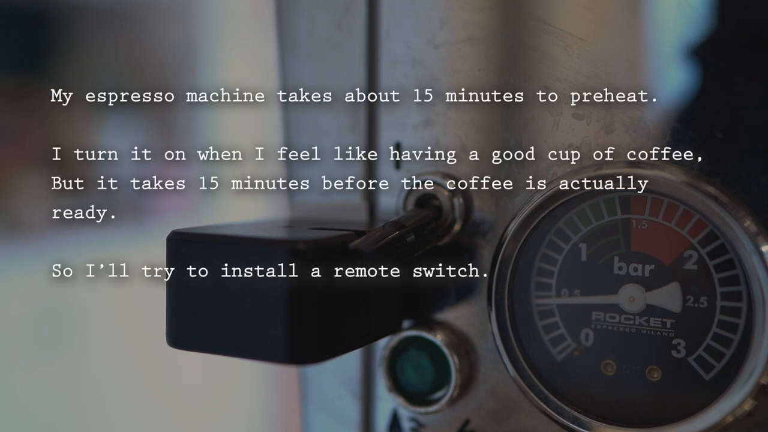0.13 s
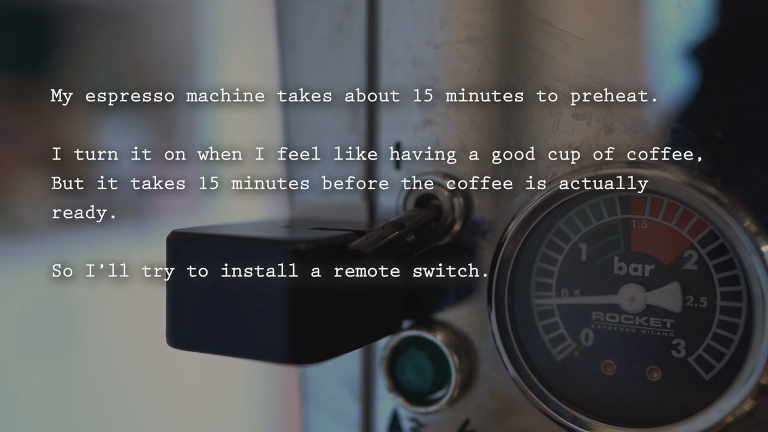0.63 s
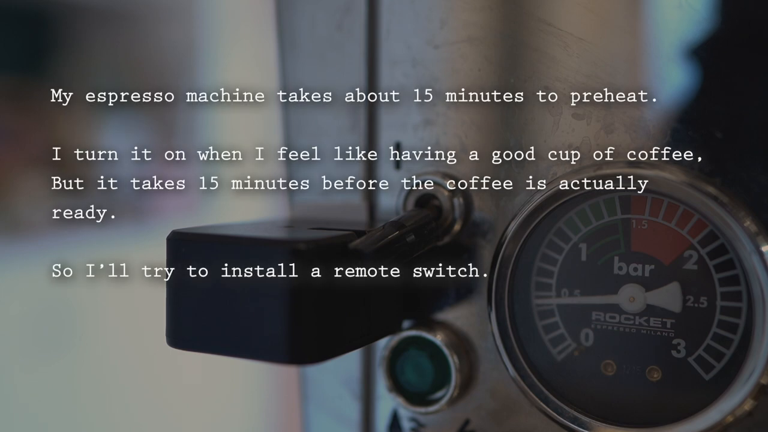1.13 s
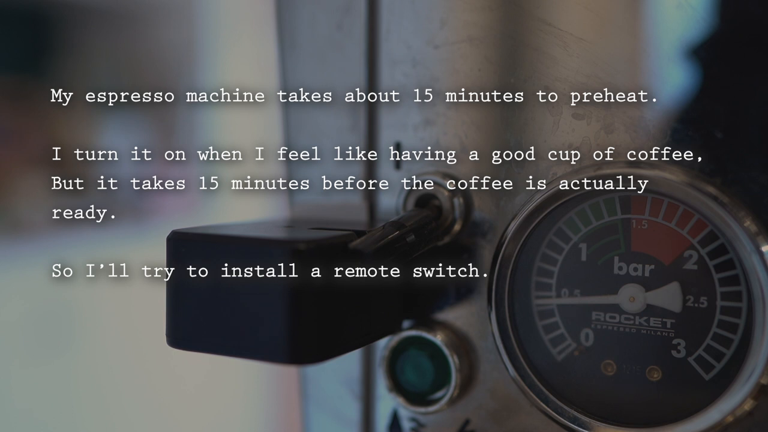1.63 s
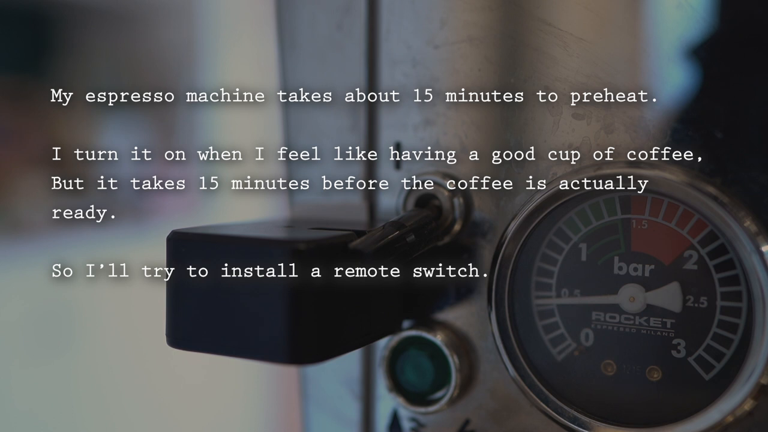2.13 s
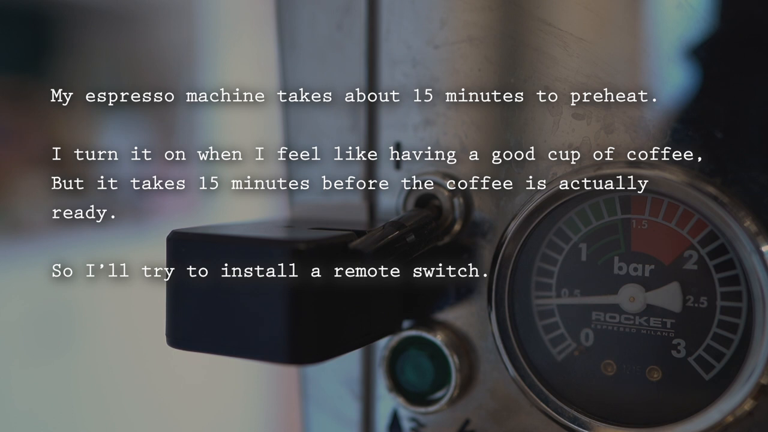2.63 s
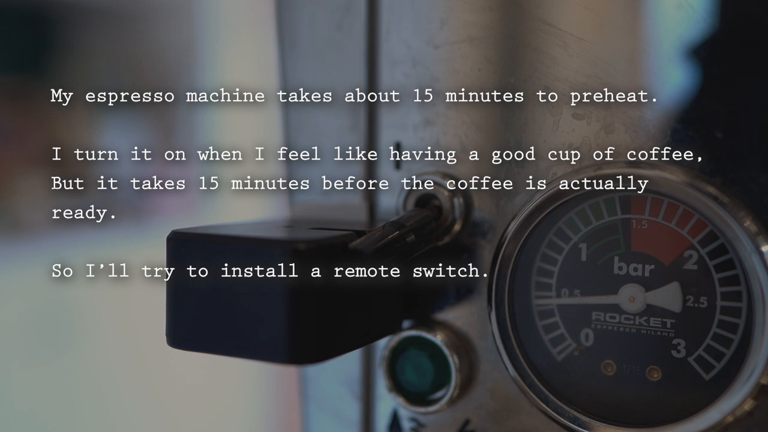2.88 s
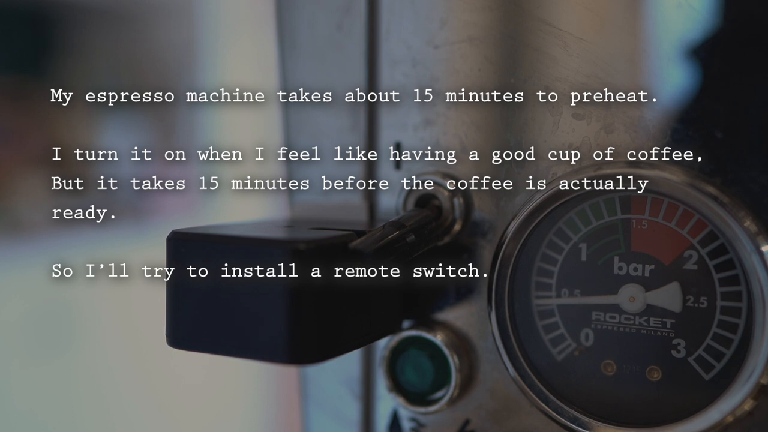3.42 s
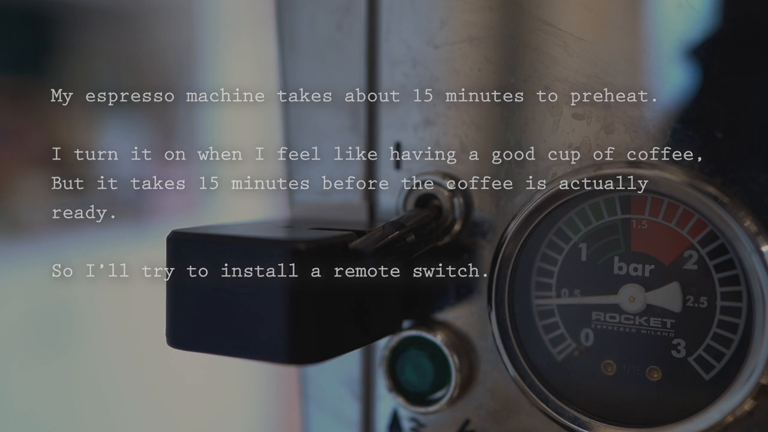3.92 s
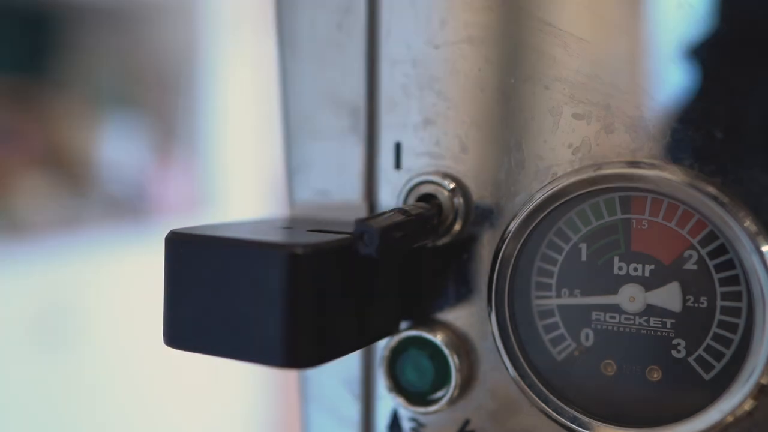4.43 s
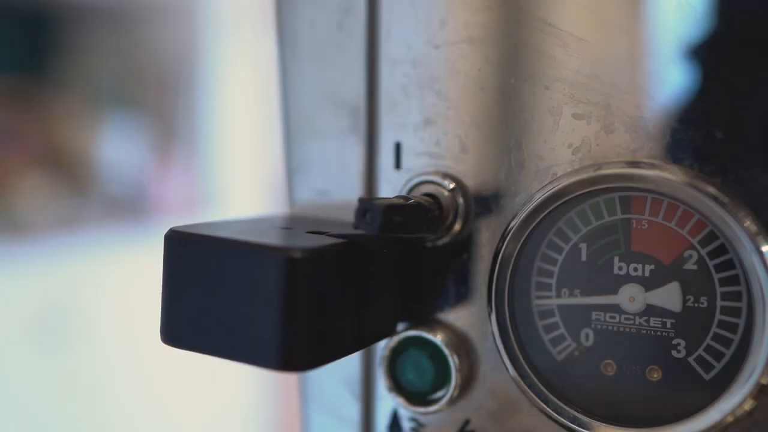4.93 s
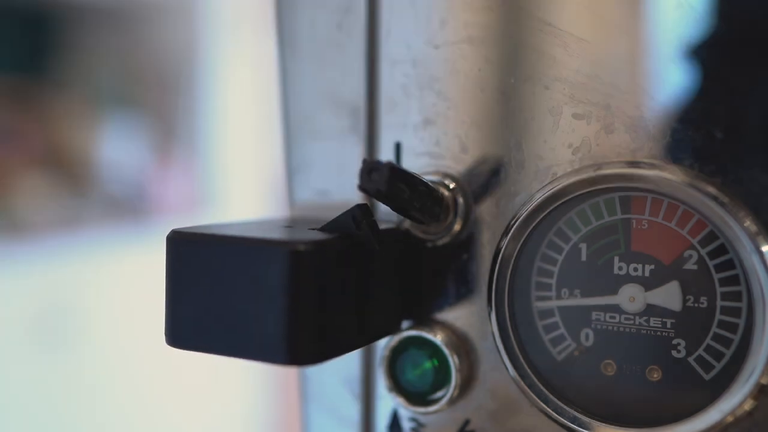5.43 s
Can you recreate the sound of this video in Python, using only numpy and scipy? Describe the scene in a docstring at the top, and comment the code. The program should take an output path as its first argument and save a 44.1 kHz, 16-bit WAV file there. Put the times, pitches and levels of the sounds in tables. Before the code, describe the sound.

A quiet kitchen with low rumble and faint hiss; a wall clock ticks softly twice, a second apart. Then a small geared motor in a plastic box starts abruptly with a tiny rattle, whines steadily, and slides down in pitch as it strains. A metal toggle switch snaps very loudly, ringing its steel cabinet and echoing briefly. Close stereo microphone.

```python
"""Quiet kitchen: a small geared motor in a plastic case pushes the lever of a toggle switch on a steel cabinet.
Motor: shaft-order lines and grainy noise through ranges of the case; slows as the lever's spring loads it.
Switch: slips, landing and bounces strike decaying modes of body and cabinet; noise bands die away as the echo.
Background: a wall clock ticks twice (struck modes) over rumble, a narrow hum and microphone hiss (shaped noise)."""
import sys
import numpy as np
from scipy import signal
from scipy.fft import rfft, irfft, next_fast_len
from scipy.io import wavfile
from scipy.ndimage import uniform_filter1d

SR = 44100
rng = np.random.default_rng(int(sys.argv[2]) if len(sys.argv) > 2 else 0)


def store_pcm(level_fs):
    """Save levels as 16-bit WAV."""
    pcm = np.round(np.clip(level_fs, -1, 1) * 32767).astype(np.int16)
    wavfile.write(sys.argv[1], SR, np.atleast_2d(pcm).T)


def how_loud(loudness_db):
    """Turn decibels into a plain amplitude multiplier (0 dB gives 1, 20 dB gives 10)."""
    steps = np.asarray(loudness_db, float) / 20
    return 10 ** steps


N = 244755

# room rumble spectrum, relative: f/Hz, level/dB
ROOM_SPECTRUM = [(12, -38), (20, -13), (70, -5.5), (102, -7.5), (171, -4), (256, -6), (289, -1),
                 (316, -12.5), (339, -2.5), (418, -9.5), (456, -6.5), (1300, -14), (1690, -73),
                 (2860, -120)]
# left-right likeness of the rumble: f/Hz, likeness/1
ROOM_LIKENESS = [(60, 0.97), (130, 0.93), (290, 0.78), (640, -0.15), (1410, -0.3), (3100, -1.17),
                 (6820, 0.81), (15000, 0.14)]
# microphone hiss spectrum, relative: f/Hz, density/dB per Hz
MIC_HISS_SPECTRUM = [(760, -71), (1300, -2.5), (3010, -6), (9970, -9.5), (15200, -12), (16000, -20)]
ROOM_DB, MIC_HISS_DB = -62.5, -63.5
HUM_HZ, HUM_WIDTH_HZ, HUM_DB = 290, 20, -76

# clock ticks: t/s, level/dB
CLOCK_TICKS = [(1.6495, -48.5), (2.651, -49.5)]
# clock modes: f/Hz, level/dB, t60/s
CLOCK_MODES = [(770, -5, .035), (930, -4, .04)]

# shaft speed as tooth-mesh rate: t/s, f/Hz
MESH_RATE = [(3.76, 1500), (3.82, 1700), (3.87, 1719), (4.075, 1698), (4.12, 1630), (4.2, 1415),
             (4.26, 1232), (4.33, 1197), (4.47, 1075), (4.52, 900), (4.6, 790), (5.06, 650)]
# armature slot harmonics, from the first: level/dB
SLOT_HARMONICS_DB = [-8, -6, -8, -5, -3, -6, 7, 10, 3, -3, 2, 10, -5, -2, -6]
# tooth-mesh harmonics, from the fourth: level/dB
MESH_HARMONICS_DB = [6, 12, 7, 3, 3, 4, 6, 6, 5, 4]
TEETH, SLOTS = 12, 3
OTHER_ORDER_DB, HIGH_SLOT_DB = -7, -3   # remaining shaft orders; slot harmonics past the table
# steady whine over grinding: mesh f/Hz, level/dB
WHINE_OVER_GRIND = [(650, -20), (900, -9), (1090, -1), (1200, 6), (1300, 3), (1450, 4), (1600, 8),
                    (1715, 8)]
UNSETTLED_DB = -22   # added to the whine before the gears settle
# grinding noise per case range (buzz, rattle, high hiss, drone, rumble), subtracted from the whine: level/dB
GRIND_DB = [-2, 1.5, 2.5, 5, 8]
# what the case passes, relative, one table per range: f/Hz, density/dB per Hz
BUZZ_SPECTRUM = [(1120, -45), (1900, -13), (2200, -8), (2580, -10), (2700, 1), (2800, 2), (3000, -2),
                 (3260, -9), (3650, -10), (3900, -19), (4200, -38), (5200, -56)]
# as above, rattle range: f/Hz, density/dB per Hz
RATTLE_SPECTRUM = [(4000, -52), (5300, -44), (5750, -12), (6250, -3), (6900, -3), (7600, -1), (8300, -1),
                   (8700, -5), (9100, -2), (9500, -8), (11000, -30), (16000, -70)]
# as above, high hiss band: f/Hz, density/dB per Hz
HIGH_HISS_SPECTRUM = [(6000, -16), (8500, -14), (10100, 6), (11700, 4), (12800, 3.5), (14300, 0),
                      (15500, 2), (16000, -65)]
# as above, drone range: f/Hz, density/dB per Hz
DRONE_SPECTRUM = [(530, -48), (900, -5.5), (1200, -8.5), (1310, 5), (1750, 7.5), (2300, -26), (2990, -36),
                  (5060, -120)]
# as above, rumble range: f/Hz, density/dB per Hz
RUMBLE_SPECTRUM = [(60, -37), (110, -5), (200, -2), (400, -6), (600, -3), (900, -11.5), (1300, -19),
                   (2500, -60)]
# even running noise between the ranges, relative: f/Hz, density/dB per Hz
WHIRR_SPECTRUM = [(1000, -41), (1800, -3), (4300, -5), (5600, 4), (6500, -2), (9000, 2.5), (11000, -18),
                  (16000, -60)]
# motor balance: f/Hz, left minus right/dB
MOTOR_PAN = [(60, -1), (110, -7), (200, -12), (380, 6), (700, 1), (1290, -4), (2380, 1), (4400, -15.5),
             (8120, -4.5), (15000, -4.5)]
# left-right likeness of the grinding: f/Hz, likeness/1
MOTOR_LIKENESS = [(60, 0.86), (130, 0.98), (290, 0.57), (640, 0.18), (1410, 0.18), (3100, 0.88),
                  (6820, 0.02), (15000, 0.32)]
# level of the high hiss band up to the snap: t/s, level/dB
HIGH_HISS_LEVEL = [(3.77, -68), (3.776, -54), (3.798, -44), (3.822, -58), (3.89, -52.5), (3.922, -57),
                   (4.176, -46), (4.452, -48.5), (4.794, -72), (4.948, -71), (4.958, -71), (5.052, -53.5)]
ON_S, SPIN_UP_S, SETTLE_S = 3.768, .0084, .11   # power on; sound rises; gears settle
OFF_S, RUN_ON_DB, COAST_DB_PER_S = 5.225, -43, 700   # power cut; high hiss then; fall after it
FULL_SPEED_HZ = 1715   # mesh rate; octaves below count slowing
BUZZ_DB, BUZZ_DB_PER_OCTAVE, BUZZ_TOP_DB = -60.5, 7, -55   # harder as the shaft slows
FLUTTER_DB_PER_OCTAVE = .5   # and less evenly
RATTLE_DB, RATTLE_FOLLOWS = -57, .57   # at -50 dB high hiss; share of its swing
RATTLE_SINGS_DB, RATTLE_SINGS_OCTAVES = 8, .17   # extra near full speed; how near
DRONE_DB, DRONE_SINGS_DB, DRONE_SINGS_OCTAVES = -80, 23.5, .05
RUMBLE_DB, RUMBLE_DB_PER_OCTAVE, RUMBLE_WAVER_DB = -69, 1.5, 2.5
WHIRR_DB, WHIRR_DB_PER_OCTAVE = -66, 1.5

# small gears' ringing modes: f/Hz, level/dB, t60/s
GEAR_MODES = [(2800, -8, .008), (6900, -11, .004), (9500, -6, .004), (10400, -4, .005), (11300, -3, .005),
              (12600, -11, .003)]
# start-up knock: t/s, level/dB
KNOCK_EVENTS = [(3.803, -48)]
# knock modes: f/Hz, level/dB, t60/s
KNOCK_MODES = [(1520, -0.5, 0.014), (2770, 2, .01)]
TOUCH_S, TOUCH_DB = 3.7757, -44
CHATTER_S, CHATTER_GAP_S, CHATTER_DB = 3.789, .0038, -45
KITCHEN_DB, KITCHEN_T60_S = -6, .25   # tail relative to direct motor sound

# switch body modes: f/Hz, level/dB, t60/s
SWITCH_MODES = [(2550, -6, .008), (3000, -4, .007), (3400, -8, .006), (3800, -5, .008), (6200, -9, .004),
                (7500, -12, .004), (8600, -10, .004), (10300, -9, .004), (11600, -10, .004),
                (13700, -11, .003), (15200, -18, .003)]
# steel cabinet modes: f/Hz, level/dB, t60/s
CABINET_MODES = [(236, -11, .6), (291, -14.5, 2.5), (352, -8, .58), (410, -2, .45), (472, -3, .4),
                 (500, -4, .35), (530, 6, .07), (545, -9, 1.3), (566, -5, .4), (714, -2, .36),
                 (790, -4, .33), (825, -5.5, 1.6), (888, -8, .39), (1093, -11, .44), (1392, -8, .2),
                 (1653, -16, 1.3), (1769, 0, .12), (2213, -4, .22), (2540, -4, .2), (3128, -11, .31),
                 (3951, -12, .54)]
# echo spectrum in cabinet and room, relative: f/Hz, level/dB
ECHO_SPECTRUM = [(41, -56), (70, -8), (155, -34), (385, -9.5), (649, -13.5), (797, -5), (1250, -17),
                 (1580, -10.5), (1980, -14.5), (2480, -7.5), (3900, -12), (4500, -15.5), (5250, -14.5),
                 (5620, -18.5), (6160, -12.5), (10400, -10), (16000, -11)]
# echo decay: f/Hz, t60/s
ECHO_DECAY = [(100, 0.97), (260, 0.77), (700, 0.48), (1840, 0.42), (4850, 0.38), (12800, 0.2)]
# left-right likeness of echo and kitchen tail: f/Hz, likeness/1
ECHO_LIKENESS = [(60, .97), (290, .96), (640, .85), (1100, .6), (1600, .35), (3100, .09), (6820, 0),
                 (15000, 0)]
CABINET_DB, ECHO_DB = -38, -19.5
LANDS_S, LANDS_DB = 5.0691, -9.5
SLIP_GAP_S, SLIP_QUICKENS, SLIP_RISE_DB = .00055, 1.2, 4.2   # SLIP_QUICKENS: exponent
BOUNCE_S, BOUNCE_GAP_S, BOUNCE_DB, BOUNCE_LOSS_DB = 5.07, .0014, -15.5, 2.8


def rms_one(x):
    """Scale to unit rms."""
    return x / np.sqrt(np.mean(x ** 2) + 1e-20)


def at_hz(points, hz):
    """Read a table on a log-frequency axis."""
    table_hz, values = np.transpose(points)
    return np.interp(np.log(hz + 1), np.log(table_hz), values)


def bins_hz(size):
    """Bin frequencies of a real FFT."""
    return np.arange(size // 2 + 1) * SR / size


def colour(x, spectrum):
    """Shape by a spectrum; rms 1."""
    size = x.shape[-1]
    gain = how_loud(at_hz(spectrum, bins_hz(size)))
    return rms_one(irfft(rfft(x) * gain, size))


def stereo_noise(size, likeness):
    """White noise whose channels share a frequency-dependent part."""
    mid, side = rfft(rng.standard_normal((2, size)))
    alike = np.clip(at_hz(likeness, bins_hz(size)), -.99, .99)
    shared = np.sqrt(1 + alike) * mid
    opposed = np.sqrt(1 - alike) * side * [[1], [-1]]
    return irfft(shared + opposed, size) / np.sqrt(2)


def drift(t_s, per_s):
    """Random values joined by straight lines."""
    knots_s = np.arange(t_s[0], t_s[-1] + 1, 1 / per_s)
    return np.interp(t_s, knots_s, rng.standard_normal(len(knots_s)))


def ring(events, modes, spread_db):
    """Each blow strikes every decaying mode, with its own strength in each ear."""
    out = np.zeros((2, N))
    at = [round(t_s * SR) for t_s, _ in events]
    blow_db = np.array(events)[:, 1]
    for hz, level_db, t60_s in modes:
        clicks = np.full((2, N), 1e-18)   # tiny floor, inaudible
        uneven_db = spread_db * rng.standard_normal((len(at), 2)).T
        clicks[:, at] = how_loud(blow_db + level_db + uneven_db)
        r = how_loud(-60 / (t60_s * SR))
        w = 2 * np.pi * hz / SR
        out += signal.lfilter([0, np.sin(w)], [1, -2 * r * np.cos(w), r * r], clicks)
    return out


def room_tone():
    """Rumble, microphone hiss and a narrow hum, all shaped noise."""
    size = next_fast_len(N)
    resonance = 1 / (1 + ((bins_hz(size) - HUM_HZ) / HUM_WIDTH_HZ * 2) ** 2)
    hum = rms_one(irfft(rfft(rng.standard_normal(size)) * resonance, size))
    rumble = how_loud(ROOM_DB) * colour(stereo_noise(size, ROOM_LIKENESS), ROOM_SPECTRUM)
    rumble[1] = np.roll(rumble[1], 10)   # reaches the left first
    hiss = how_loud(MIC_HISS_DB) * colour(rng.standard_normal((2, size)), MIC_HISS_SPECTRUM)
    return (rumble + hiss + how_loud(HUM_DB) * hum)[:, :N]


def clock():
    """Dull wooden ticks: two short low modes."""
    return ring(CLOCK_TICKS, CLOCK_MODES, spread_db=1.0)


def kitchen(x):
    """Direct sound plus a dying noise tail, which smears gliding lines."""
    t_s = np.arange(SR // 2) / SR
    decay = how_loud(-60 * t_s / KITCHEN_T60_S) * (t_s > .003)
    tail = stereo_noise(len(t_s), ECHO_LIKENESS) * decay
    tail /= np.sqrt(np.sum(tail ** 2) / 2)
    wet = signal.fftconvolve(x.mean(axis=0, keepdims=True), tail, axes=1)[:, :N]
    return (x + how_loud(KITCHEN_DB) * wet) / np.sqrt(1 + how_loud(2 * KITCHEN_DB))


def slack():
    """The gears touch, chatter and knock as the motor starts."""
    chatter = [(CHATTER_S + CHATTER_GAP_S * (k + .15 * late), CHATTER_DB + 1.5 * louder)
               for k, (late, louder) in enumerate(rng.standard_normal((6, 2)))]
    gears = ring([(TOUCH_S, TOUCH_DB)] + chatter, GEAR_MODES, spread_db=2.0)
    return gears + ring(KNOCK_EVENTS, KNOCK_MODES, spread_db=1.0)


def range_levels_db(t_s, mesh_hz, settled):
    """Level of each case range, then the whirr, from shaft speed and high hiss."""
    slowed = np.log2(FULL_SPEED_HZ / mesh_hz)   # octaves
    high_hiss = np.interp(t_s, *np.transpose(HIGH_HISS_LEVEL + [(OFF_S, RUN_ON_DB)]))
    spin_up = 20 * np.log10(1 - np.exp(-((t_s - ON_S) / SPIN_UP_S) ** 2) + 1e-4)
    coast = -COAST_DB_PER_S * np.maximum(t_s - OFF_S, 0)
    buzz = np.minimum(BUZZ_DB + BUZZ_DB_PER_OCTAVE * slowed, BUZZ_TOP_DB)
    buzz = buzz + FLUTTER_DB_PER_OCTAVE * slowed * drift(t_s, per_s=80)
    rattle = RATTLE_DB + RATTLE_FOLLOWS * (high_hiss + 50)
    rattle = rattle + RATTLE_SINGS_DB * settled * np.exp(-(slowed / RATTLE_SINGS_OCTAVES) ** 2)
    drone = DRONE_DB + DRONE_SINGS_DB * settled * np.exp(-(slowed / DRONE_SINGS_OCTAVES) ** 2)
    rumble = RUMBLE_DB + RUMBLE_DB_PER_OCTAVE * slowed + RUMBLE_WAVER_DB * drift(t_s, per_s=30)
    whirr = WHIRR_DB + WHIRR_DB_PER_OCTAVE * slowed
    return spin_up + coast + np.array([buzz, rattle, high_hiss, drone, rumble, whirr])


def order_levels_db():
    """Level of each multiple of the shaft speed: slot and mesh harmonics over the rest."""
    order_db = np.full(TEETH * (len(MESH_HARMONICS_DB) + 3) + 1, float(OTHER_ORDER_DB))
    order_db[SLOTS::SLOTS] = HIGH_SLOT_DB
    order_db[SLOTS::SLOTS][:len(SLOT_HARMONICS_DB)] = SLOT_HARMONICS_DB
    order_db[4 * TEETH::TEETH] = MESH_HARMONICS_DB
    order_db[1] = 0   # unbalance, once a turn
    return order_db


def gear_whine(t_s, shaft_hz, wobble=.0012, waver_db=3.0):
    """Sines at multiples of a slightly unsteady shaft speed; each line swells and fades."""
    shake = rms_one(uniform_filter1d(rng.standard_normal(len(t_s)), size=600))
    turns = np.cumsum(shaft_hz * (1 + wobble * shake)) / SR
    order_db = order_levels_db()
    phases = rng.uniform(0, 2 * np.pi, (len(order_db), 2))
    knots_s = np.linspace(t_s[0], t_s[-1], 40)
    whine = np.zeros((2, len(t_s)))
    for k, phase in enumerate(phases):
        below_nyquist = k * shaft_hz < SR / 2
        waver = np.interp(t_s, knots_s, rng.standard_normal(40))
        ear_phase = phase[0] + np.array([[0], [1.4 * np.sin(phase[1])]])
        line = np.sin(2 * np.pi * k * turns + ear_phase)
        whine += below_nyquist * how_loud(order_db[k] + waver_db * waver) * line
    return rms_one(whine * np.sqrt(shaft_hz / shaft_hz.max()))   # slower shaft, denser lines


def grinding(size, grain_db=3.0):
    """Stereo noise with a fast random grain in its level."""
    grain = rms_one(uniform_filter1d(rng.standard_normal(size), size=40))
    return rms_one(how_loud(grain_db * grain) * stereo_noise(size, MOTOR_LIKENESS))


def motor():
    """Whine and grinding drive five ranges of the case; whirr and gear slack are added."""
    start = round(ON_S * SR)
    t_s = np.arange(start, start + round(1.57 * SR)) / SR
    run = slice(start, start + len(t_s))
    mesh_hz = np.interp(t_s, *np.transpose(MESH_RATE))
    settled = 1 - np.exp(-((t_s - ON_S) / SETTLE_S) ** 2)
    range_db = range_levels_db(t_s, mesh_hz, settled)
    whine_db = at_hz(WHINE_OVER_GRIND, mesh_hz) + UNSETTLED_DB * (1 - settled) ** 2
    whine, grind = gear_whine(t_s, mesh_hz / TEETH), grinding(len(t_s))
    spectra = (BUZZ_SPECTRUM, RATTLE_SPECTRUM, HIGH_HISS_SPECTRUM, DRONE_SPECTRUM, RUMBLE_SPECTRUM)
    out = np.zeros((2, N))
    for spectrum, level_db, grind_db in zip(spectra, range_db, GRIND_DB):
        share = how_loud(whine_db - grind_db)
        drive = (share * whine + grind) / np.sqrt(1 + share ** 2)
        out[:, run] += how_loud(level_db) * colour(drive, spectrum)
    out[:, run] += how_loud(range_db[-1]) * colour(grind, WHIRR_SPECTRUM)
    out += slack()
    pan_db = at_hz(MOTOR_PAN, bins_hz(N)) * [[.5], [-.5]]
    return irfft(rfft(out) * how_loud(pan_db), N)


def snap():
    """Four quickening slips of the spring, the landing, three bounces: t/s, level/dB."""
    uneven_s = rng.standard_normal(5) * .0001
    slips = [(LANDS_S - SLIP_GAP_S * k ** SLIP_QUICKENS + uneven_s[k], LANDS_DB - SLIP_RISE_DB * k)
             for k in range(5)]   # k = 0 is the landing
    bounces = [(BOUNCE_S + BOUNCE_GAP_S * k, BOUNCE_DB - BOUNCE_LOSS_DB * k) for k in range(3)]
    return slips + bounces


def echo(rise_s=.0018):
    """Diffuse sound after the snap: third-octave noise bands, each dying at its own rate."""
    start = round((LANDS_S - .002) * SR)
    t_s = np.arange(N - start) / SR
    noise = rfft(colour(stereo_noise(len(t_s), ECHO_LIKENESS), ECHO_SPECTRUM))
    octave = np.log2(bins_hz(len(t_s)) + 1)
    out = np.zeros((2, N))
    for centre in np.arange(6.6, 14.4, 1 / 3):   # log2 of Hz
        centre_hz = 2 ** centre
        band = irfft(noise * np.clip(1 - 3 * abs(octave - centre), 0, 1), len(t_s))
        lag_s = rise_s + .95 / centre_hz   # lows build up later
        rise = 1 - np.exp(-(t_s / lag_s) ** 2)
        out[:, start:] += band * rise * how_loud(-60 * t_s / at_hz(ECHO_DECAY, centre_hz))
    return how_loud(ECHO_DB) * out


def switch():
    """The snap rings switch body and steel cabinet; body and echo are louder on the right."""
    body = ring(snap(), SWITCH_MODES, spread_db=1.5) * how_loud([[-2], [2]])
    body[1] = np.roll(body[1], round(.00033 * SR))   # right ear later
    no_bass = signal.butter(4, 1900, "high", fs=SR, output="sos")   # small parts radiate none
    body = signal.sosfilt(no_bass, body)
    cabinet = how_loud(CABINET_DB) * ring([(LANDS_S, 0)], CABINET_MODES, spread_db=1.0)
    cabinet = signal.sosfilt(signal.butter(4, 200, "high", fs=SR, output="sos"), cabinet)
    return body + cabinet + echo() * how_loud([[-1], [1]])


def scene():
    """All sources together."""
    return room_tone() + clock() + kitchen(motor()) + switch()


def low_pass(x):
    """Removes everything above the highest recorded frequency."""
    return signal.sosfilt(signal.butter(12, 17040, fs=SR, output="sos"), x)


def record(dry):
    """The finished mix, as recorded."""
    return low_pass(dry)


dry = scene()
out = record(dry)
store_pcm(out)
```